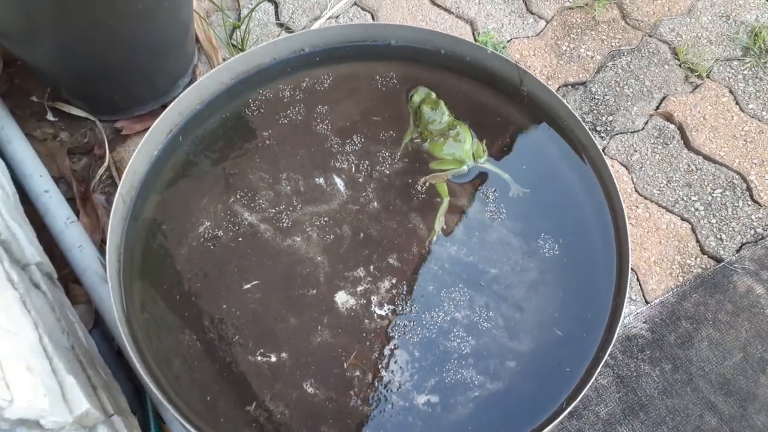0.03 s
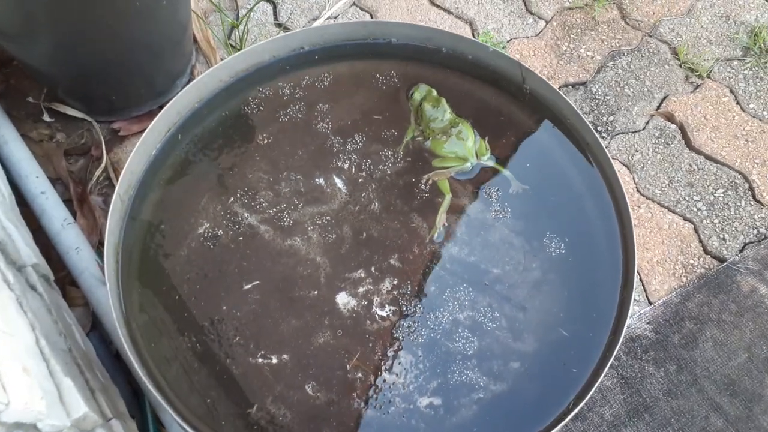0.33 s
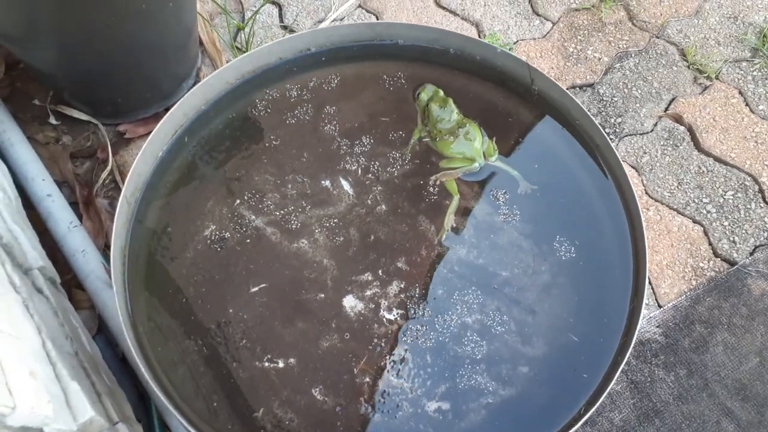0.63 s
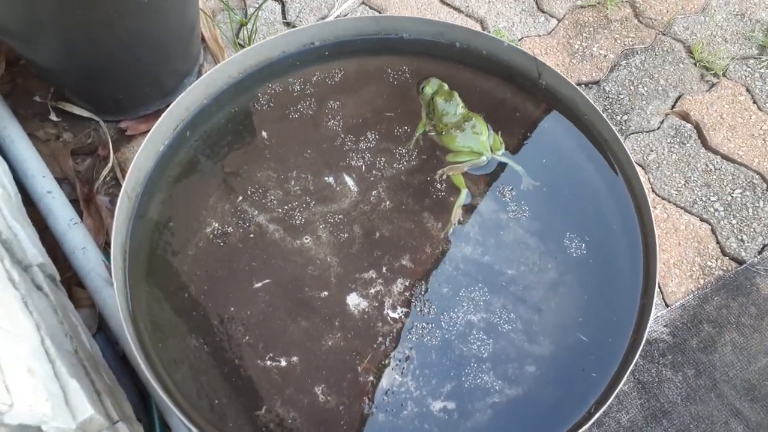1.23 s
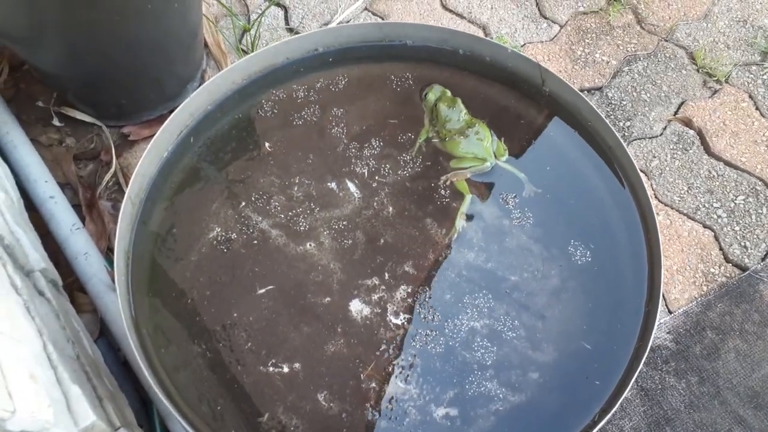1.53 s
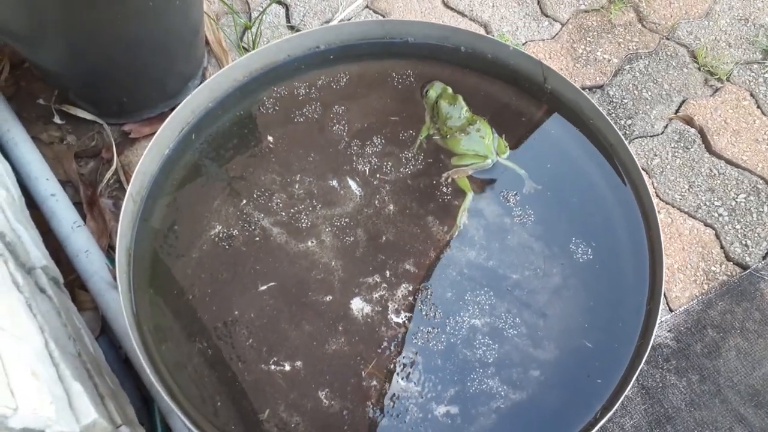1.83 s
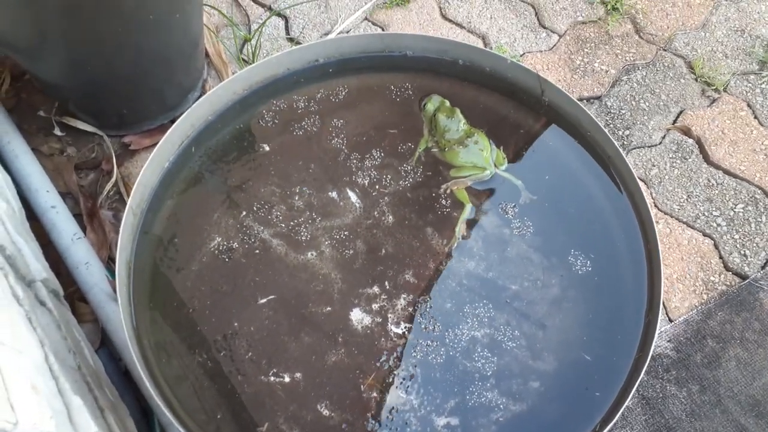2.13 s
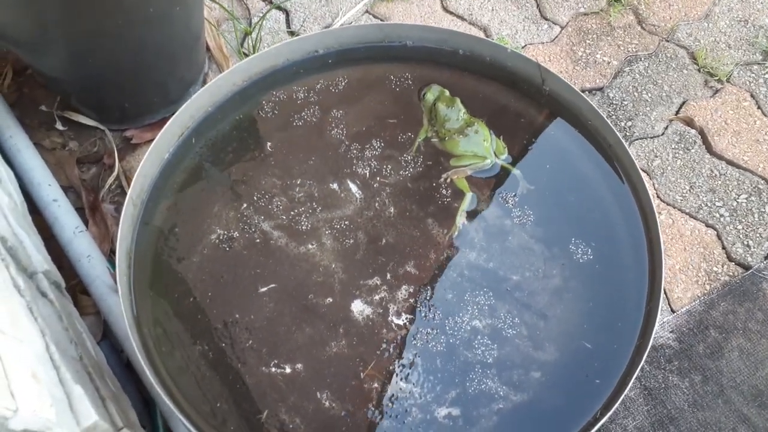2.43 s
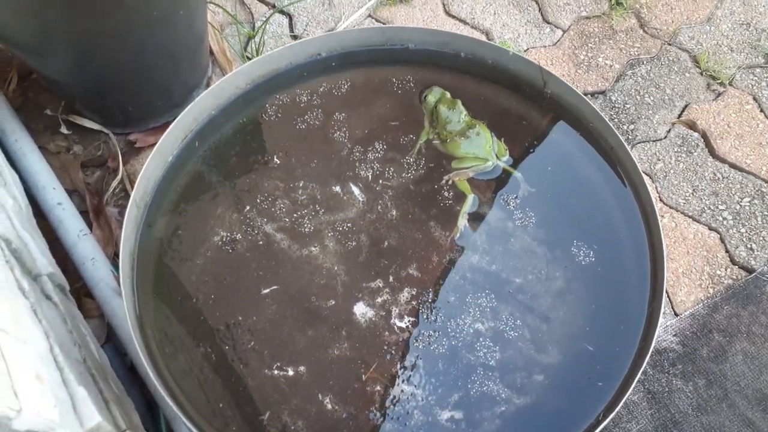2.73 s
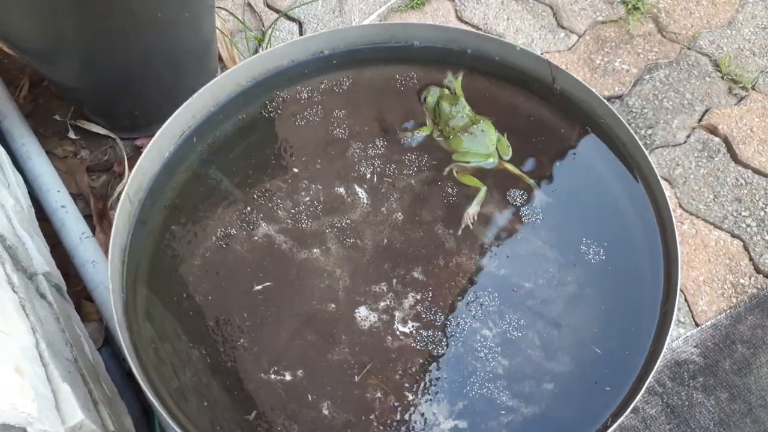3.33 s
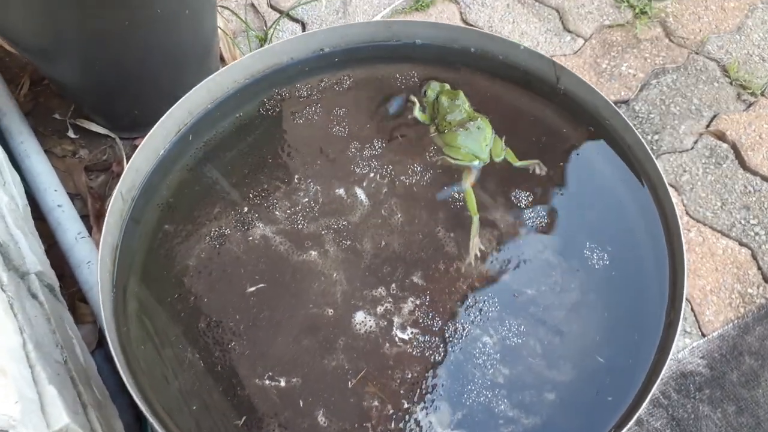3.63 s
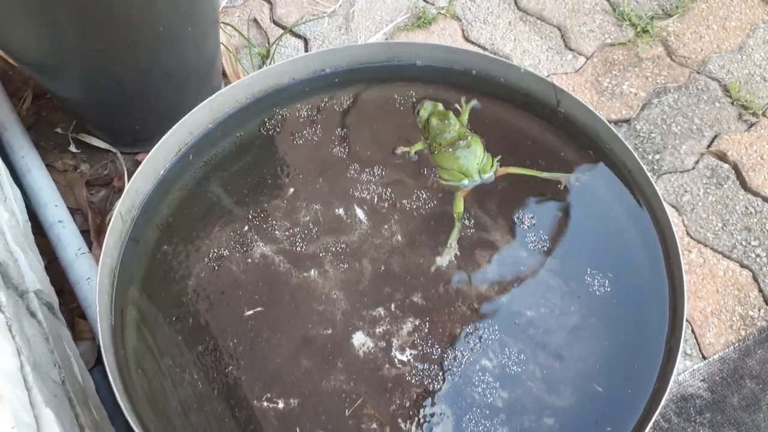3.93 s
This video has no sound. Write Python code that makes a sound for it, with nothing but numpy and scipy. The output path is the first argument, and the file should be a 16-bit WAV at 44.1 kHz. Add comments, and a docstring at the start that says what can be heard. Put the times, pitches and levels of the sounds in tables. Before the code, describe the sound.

Birds whistle and call outdoors over a low rumble and a distant engine drone.

```python
"""A paved garden. A distant engine drones throughout under a low rumble and a thin high hiss.
From the start a dove coos far off and small birds whistle; house walls and trees throw the calls back.
A frog paddling in a tub makes one tiny tick as a bird gives a nasal call. A long far whistle sinks,
then come a close pip and a loud falling whistle. In the second half the dove coos in a run,
and the frog's kicks stir up two faint swishes and two more ticks."""
import sys
import numpy as np
from scipy import signal
from scipy.fft import rfft, irfft
from scipy.io import wavfile

SR = 44100
rng = np.random.default_rng(int(sys.argv[2]) if len(sys.argv) > 2 else 0)


def pcm_store(signal):
    """Save signal as 16-bit PCM."""
    levels = np.round(np.clip(np.atleast_2d(signal), -1, 1) * 32767)
    wavfile.write(sys.argv[1], SR, levels.astype(np.int16).T)


N = 176400


def undb(db):
    """Decibels to gain."""
    return 10 ** (np.asarray(db) / 20)


def times():
    """Time of every sample in seconds."""
    return np.arange(N) / SR


def unit(x):
    """Scale to rms 1."""
    return x / np.sqrt(np.mean(x ** 2))


def pan(db):
    """Left and right gains for a level difference; positive leans left."""
    return undb(np.array([[db], [-db]]) / 2)


def wander(rate_hz):
    """Smooth random modulation of rms 1, rolled off above rate_hz."""
    f = np.fft.rfftfreq(N, 1 / SR)
    return unit(irfft(rfft(rng.standard_normal(N)) / (1 + (f / rate_hz) ** 4), N))


def noise(colour):
    """Noise of rms 1, shaped by EQ points (f/Hz, relative level/dB)."""
    hz, db = np.array(colour, float).T
    f = np.fft.rfftfreq(N, 1 / SR)
    eq = undb(np.interp(np.log(f + 1), np.log(hz), db))
    return unit(irfft(rfft(rng.standard_normal(N)) * eq, N))


def wide_noise(colour):
    """Shaped noise, independent left and right."""
    return np.array([noise(colour) for _ in range(2)])


def curve(rows):
    """One automation line for each column after a table's time column."""
    s, *cols = np.array(rows, float).T
    return [np.interp(times(), s, c) for c in cols]


def gate(rows):
    """Open between the first and last time of a table, with 4 ms fades."""
    return np.clip(np.minimum(times() - rows[0][0], rows[-1][0] - times()) / .004, 0, 1)


def tone(hz):
    """Sine of rms 1 on a moving pitch."""
    return np.sqrt(2) * np.sin(2 * np.pi * np.cumsum(hz) / SR)


def delay(x, s):
    """The same sound s seconds later."""
    t = np.arange(len(x)) / SR
    return np.interp(t - s, t, x, left=0)


def add(out, x, s):
    """Mix a stereo sound in at time s."""
    i = max(int(s * SR), 0)
    out[:, i:i + x.shape[1]] += x[:, :N - i]


def garden(x, scatter_db, pan_db, wall_db, lag_ms=0., scatter_pan_db=None):
    """Direct sound, a wall slap, dense scatter from paving and leaves, a late return from far houses."""
    wall_s, scatter_t60_s = .02, 0.4
    houses_s, houses_spread_s, houses_db = .24, 0.11, -13.5
    t = np.arange(SR * 3 // 4) / SR
    early = undb(-60 * t / scatter_t60_s) * (1 - np.exp(-t / 0.018))
    late = np.exp(-.5 * ((t - houses_s) / houses_spread_s) ** 2)
    tail = early / np.linalg.norm(early) + undb(houses_db) * late / np.linalg.norm(late)
    impulse = tail * rng.standard_normal((2, len(t)))
    x = np.pad(x, (0, len(t)))
    scatter = signal.fftconvolve(x[None], impulse, axes=1)[:, :len(x)]
    scatter *= pan(pan_db if scatter_pan_db is None else scatter_pan_db)
    slapped = x + undb(wall_db) * delay(x, wall_s)
    near = np.array([delay(slapped, lag_ms / 1000), slapped]) * pan(pan_db)  # the left ear lags
    wet = undb(scatter_db)
    return (near + wet * scatter) / np.hypot(1, wet)


def note(length, start_hz, middle_hz, end_hz, peak_at, rasp):
    """One bent whistle, loudest near the share peak_at of its length; rasp shakes its pitch."""
    rasp_depth, rasp_rate_hz = .08, 600
    progress = np.linspace(0, 1, int(length * SR))
    hz = np.polyval(np.polyfit([0, .5, 1], [start_hz, middle_hz, end_hz], 2), progress)
    shake = np.interp(progress * length * rasp_rate_hz, np.arange(256), rng.standard_normal(256))
    skewed = np.interp(progress, [0, np.clip(peak_at, .05, .95), 1], [0, .5, 1])
    swell = np.abs(np.sin(np.pi * skewed)) ** 1.2
    return swell * tone(hz * (1 + rasp_depth * rasp * shake))


def rumble():
    """A low bed, alike in both ears in the bass and diffuse above."""
    # rumble EQ: f/Hz, relative level/dB
    colour = [(20, -22), (33, -13.5), (43, -13.5), (55, 2), (80, 0), (125, 3.5), (200, -1), (300, -7),
              (420, -18), (600, -26.5), (1000, -39.5), (2400, -37.5), (4000, -51.5), (7000, -55.5),
              (16000, -58.5)]
    level_db, crossover_hz = -55, 480
    f = np.fft.rfftfreq(N, 1 / SR)
    width = 1 / (1 + (crossover_hz / (f + 1)) ** 2)
    centre = rfft(noise(colour)) * np.sqrt(1 - width)
    sides = rfft(wide_noise(colour)) * np.sqrt(width)
    return irfft(centre + sides, N) * undb(level_db + 0.66 * wander(4.9)) * pan(5.4)


def far_wash():
    """A distant low-mid wash that swells and sinks on the left."""
    # wash EQ: f/Hz, relative level/dB
    colour = [(250, -20), (420, -4), (520, 0), (760, -2), (1000, -11), (1600, -17), (3000, -28)]
    # swells of the wash: t/s, level/dB
    swells = [(0, -74), (.7, -81.5), (1.3, -84), (1.8, -79), (2.2, -70), (2.7, -76.5), (3.3, -74.5),
              (3.68, -79.5), (4, -76)]
    return wide_noise(colour) * undb(curve(swells)[0]) * pan(9.7)


def hiss():
    """Thin air around 11 kHz, leaning right and barely wavering."""
    # hiss EQ: f/Hz, relative level/dB
    colour = [(3000, -13), (6000, -26.5), (7300, -40.5), (8300, -19.5), (9600, -13), (10300, -2.5),
              (11000, 2), (11700, -1.5), (12700, -5.5), (13400, -11.5), (16000, -18)]
    level_db = -73
    return wide_noise(colour) * undb(level_db + 0.73 * wander(2.4)) * pan(-5.0)


def engine():
    """A far engine slowly gains speed; only its lowest harmonics arrive, wavering."""
    # engine drone: t/s, firing rate/Hz, fundamental level/dB, second harmonic level/dB
    drone = [(0, 77.52, -51.5, -60), (.6, 77.81, -54.5, -60.5), (1.1, 81.41, -57.5, -60),
             (1.55, 82.17, -56.5, -68.5), (1.85, 82.84, -59, -63), (2.25, 84.24, -56, -56.5),
             (2.65, 83.5, -57, -64.5), (3.2, 85.12, -54, -53.5), (3.6, 88.43, -56, -64.5),
             (4, 89.7, -56.5, -59.5)]
    # third and fourth harmonics: level against the fundamental/dB
    upper_db = [-19.5, -22]
    hz, first_db, second_db = curve(drone)
    hz = hz * (1 + 0.011 * wander(11))
    levels = [first_db, second_db] + [first_db + db for db in upper_db]
    return pan(5.4) * sum(undb(db + 1.6 * wander(8)) * tone(k * hz) for k, db in enumerate(levels, 1))


def dove():
    """Soft, slightly arched coos from far away, wet with scatter."""
    # coos: t/s, length/s, f/Hz, level/dB
    coos = [(.0, 0.12, 677, -71.5), (2.152, 0.12, 659.7, -62), (2.355, 0.073, 637.5, -64.5),
            (2.421, 0.15, 660.7, -57), (2.709, 0.092, 663, -60.5), (2.894, 0.085, 652, -71.5),
            (3.021, .13, 653, -62), (3.124, 0.074, 639, -57), (3.33, 0.255, 651.2, -61.5),
            (3.765, 0.068, 669.3, -57.5), (3.881, 0.062, 700, -71.5)]
    arch = 0.041  # share by which a coo starts and ends flat
    out = np.zeros((2, N))
    for s, length, hz, db in coos:
        edge_hz = hz * (1 - arch)
        coo = undb(db) * note(length, edge_hz, hz, edge_hz, peak_at=0.54, rasp=0.53)
        add(out, garden(coo, scatter_db=-3, pan_db=6, wall_db=-14, lag_ms=.25), s)
    return out


def small_birds():
    """Short whistled notes from the trees, mostly on the left."""
    # notes: t/s, length/s, start f/Hz, middle f/Hz, end f/Hz, level/dB,
    # peak position/0-1, pan/dB, scatter/dB, rasp/0-1
    notes = [ (.002, 0.065, 3280, 3110, 2450, -67, 0.56, 10, 1.5, 0.34),
             (0.055, 0.1, 2600, 1846, 1445, -72.5, 0.25, 14, -2.5, .35),
             (0.058, 0.077, 4890, 4040, 3470, -66, 0.86, 6, 8, 0.28),
             (0.116, 0.15, 3534, 2840, 2246, -65, 0.25, 8.5, -3, 0.48),
             (0.375, 0.08, 1403, 1386, 1354, -81, 0.5, 7, 4, 0.03),
             (0.518, 0.058, 2112, 2372, 2687, -63, 1, 12, 6, 0.03),
             (0.566, 0.044, 3140, 3440, 3570, -80, 0.4, 12, -2, 0.8),
             (0.565, .12, 1353, 1323, 1090, -77, 0, 4, 5, 0.93),
             (.595, 0.13, 2450, 2463, 2500, -73, 0.17, 8.5, 9, 0.25),
             (1.04, 0.06, 2800, 2960, 2920, -89, 0.6, 6, -2, .1),
             (1.125, 0.086, 2300, 2370, 2430, -82.5, 0.44, 16, -5, 0.2),
             (1.255, 0.044, 2350, 2170, 2100, -86, .5, 2, -8, 0.05),
             (1.359, 0.03, 4405, 4185, 4100, -82, 0.4, 6, 5, 0.6),
             (1.418, 0.043, 2440, 2280, 2180, -83, 0.5, 20, -6, 0.3),
             (1.424, 0.048, 4500, 4330, 4150, -81.5, 0.6, 8, 1, 0.9),
             (1.57, .17, 7860, 7700, 7840, -81.5, 0.36, 11, 5, .6),
             (1.739, .19, 3796, 3490, 2810, -74, .6, 1, 4.5, 0.8),
             (2.123, 0.06, 5600, 5400, 5240, -75.5, 0.24, 2, 14, 0.37),
             (2.137, 0.076, 5000, 5020, 5040, -72.5, 0.08, -1, 4, 0.23),
             (2.244, .1, 8730, 8400, 8120, -78.5, 0.2, -1.5, 0.5, 0.5),
             (2.87, 0.16, 6400, 6460, 6650, -87, .5, 10, 0, 0.7),
             (2.86, .08, 8230, 7900, 8000, -85.5, .5, -12, 11, .6),
             (3.225, 0.048, 1440, 1437, 1450, -81, 0.4, 1, -16, .05),
             (3.3, 0.038, 2990, 3010, 3180, -79.5, 0.3, 7, -5, 0.15)]
    out = np.zeros((2, N))
    for s, length, start_hz, middle_hz, end_hz, db, peak_at, pan_db, scatter_db, rasp in notes:
        chirp = undb(db) * note(length, start_hz, middle_hz, end_hz, peak_at, rasp)
        add(out, garden(chirp, scatter_db, pan_db, wall_db=-17), s)
    return out


def water_ticks():
    """Tiny bright ticks as the frog stirs the water: fast-dying bursts of band noise."""
    # water ticks: t/s, level/dB
    ticks = [(0.759, -69), (3.267, -66), (3.421, -68)]
    decay_s, centre_hz, half_width_hz = 0.0074, 10000, 1800
    out, t = np.zeros((2, N)), np.arange(SR // 10) / SR
    f = np.fft.rfftfreq(len(t), 1 / SR)
    band = 1 / (1 + ((f - centre_hz) / half_width_hz) ** 2)
    for s, db in ticks:
        spray = unit(irfft(rfft(rng.standard_normal((2, len(t)))) * band))
        add(out, undb(db) * spray * np.exp(-t / decay_s), s)
    return out


def nasal_call():
    """An arched bird call of three harmonics, close on the left."""
    # call contour: t/s, f/Hz, level/dB of harmonics 1, 2 and 3
    contour = [(.76, 1097, -80, -76, -100), (.79, 1390, -73.5, -80, -84), (.824, 1506, -56, -63.5, -78),
               (.85, 1523, -54.5, -59.5, -80), (.878, 1518, -51.5, -57, -83), (.9, 1456, -57.5, -65.5, -65),
               (.926, 1395, -70, -64, -78), (.976, 1313, -73.5, -76.5, -79), (.998, 1140, -82, -85, -102)]
    hz, *levels = curve(contour)
    hz = hz * (1 + .005 * wander(170))
    call = sum(undb(db) * tone(k * hz) for k, db in enumerate(levels, 1)) * gate(contour)
    return garden(call, scatter_db=-22, pan_db=12.5, wall_db=-7.5, lag_ms=.19, scatter_pan_db=1.5)[:, :N]


def far_whistler():
    """A long sinking whistle with a fast flutter, much of it heard by reflection."""
    # whistle contour: t/s, f/Hz, level/dB
    contour = [(1.5, 1585, -85), (1.535, 1563, -62), (1.6, 1530, -58), (1.66, 1499, -58.5),
               (1.73, 1393, -62), (1.79, 1265, -62.5), (1.835, 1110, -74), (1.875, 1000, -68),
               (1.9, 960, -86.5)]
    flutter_hz, flutter_depth, jitter = 120, 0.46, .009
    hz, db = curve(contour)
    flutter = 1 + flutter_depth * tone(flutter_hz * (1 + .15 * wander(30))) / np.sqrt(2)
    call = tone(hz * (1 + jitter * wander(160))) * flutter * undb(db) * gate(contour)
    return garden(call, scatter_db=-5, pan_db=1.5, wall_db=-18, lag_ms=.22)[:, :N]


def pip():
    """One short, pure rising note from a bird close by."""
    # pitch bend: start f/Hz, middle f/Hz, end f/Hz
    bend = (1933, 2030, 2013)
    start_s, length_s, level_db = 1.918, 0.053, -49.5
    out = np.zeros((2, N))
    call = undb(level_db) * note(length_s, *bend, peak_at=0.66, rasp=0)
    placed = garden(call, scatter_db=-15, pan_db=-1.5, wall_db=-24, lag_ms=.065, scatter_pan_db=6.5)
    add(out, placed, start_s)
    return out


def near_whistler():
    """A loud falling whistle, hoarse at both ends, pure at its peak, beating against its wall echo."""
    # whistle contour: t/s, f/Hz, level/dB, roughness (0 is pure)
    contour = [(2.148, 2580, -80, 0.96), (2.18, 2544, -52.5, 1.11), (2.21, 2290, -49, 0.42),
               (2.236, 2200, -35.5, 0), (2.275, 2051, -38, 0.14), (2.32, 1960, -42, 0.37),
               (2.35, 1896, -48, 0.54), (2.372, 1857, -55, 0.2), (2.395, 1840, -91, 0.2)]
    hz, db, roughness = curve(contour)
    jitter = .035 * roughness * wander(220)
    call = tone(hz * (1 + jitter)) * undb(db) * gate(contour)
    return garden(call, scatter_db=-9.5, pan_db=-1.0, wall_db=-5, lag_ms=.06, scatter_pan_db=4.5)[:, :N]


def water_swishes():
    """A faint grainy wash that rises and falls with each of the frog's kicks."""
    # kicks: t/s, length/s, level/dB
    kicks = [(2.781, 0.21, -75.5), (3.153, 0.44, -77)]
    # stirred water EQ: f/Hz, relative level/dB
    colour = [(1500, -12), (3000, -7), (4500, -2), (6500, -29), (8500, 5), (11000, 6), (16000, -8)]
    grain_db = 0.5
    swell = sum(undb(db) * np.sin(np.pi * np.clip((times() - s) / length, 0, 1))
                for s, length, db in kicks)
    return swell * wide_noise(colour) * undb(grain_db * wander(90))


def scene():
    """The birds and the stirred water over the background bed."""
    birds = near_whistler() + far_whistler() + nasal_call() + pip() + small_birds() + dove()
    bed = rumble() + far_wash() + hiss() + engine()
    return bed + birds + water_ticks() + water_swishes()


def record(dry):
    """A 4 ms fade at each end and a steep high cut."""
    top_hz = 15800
    fade = np.clip(np.minimum(times(), times()[::-1]) / .004, 0, 1)
    return signal.sosfilt(signal.ellip(10, .2, 70, top_hz, fs=SR, output="sos"), dry * fade)


dry = scene()
out = record(dry)
pcm_store(out)
```